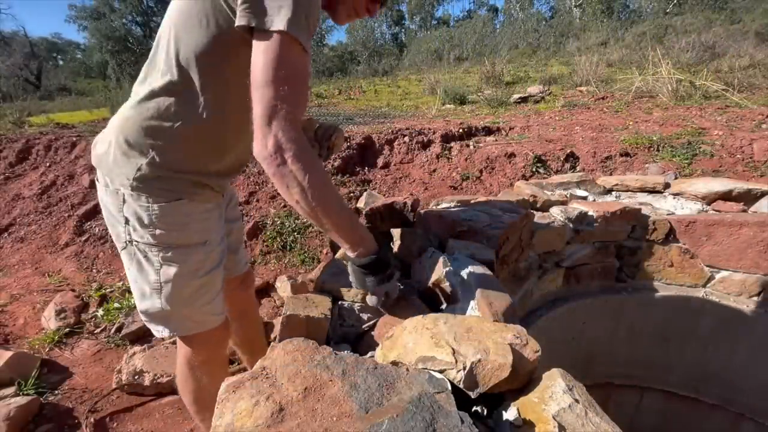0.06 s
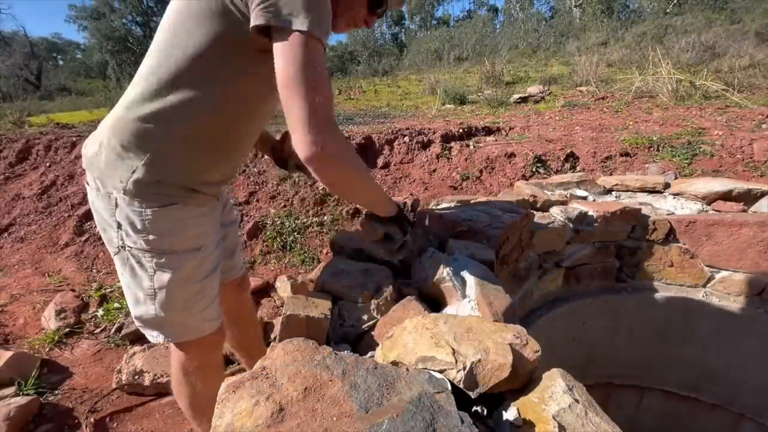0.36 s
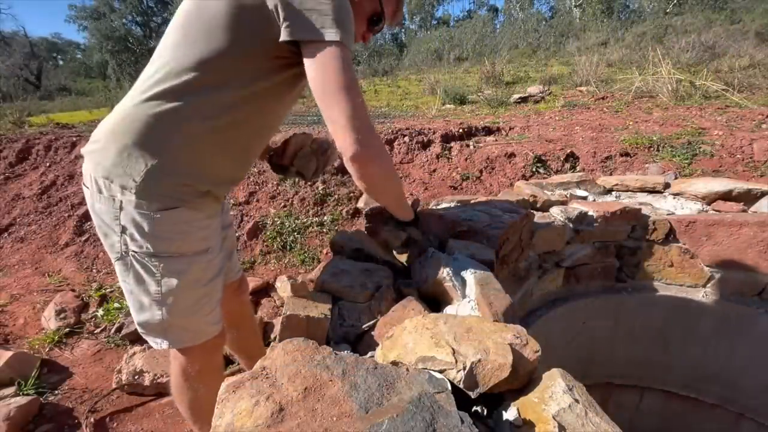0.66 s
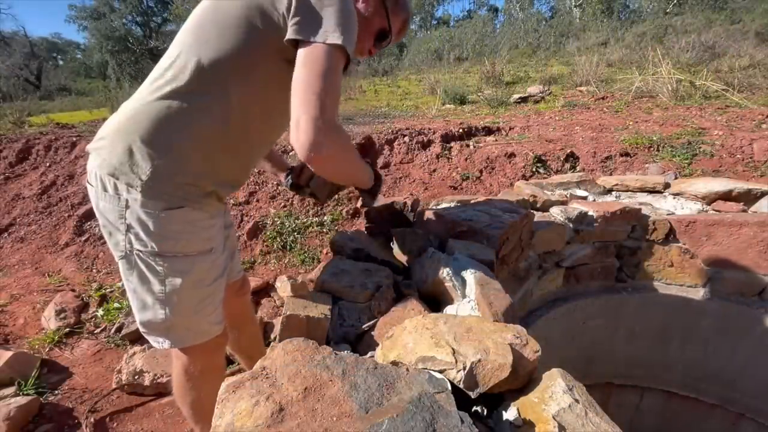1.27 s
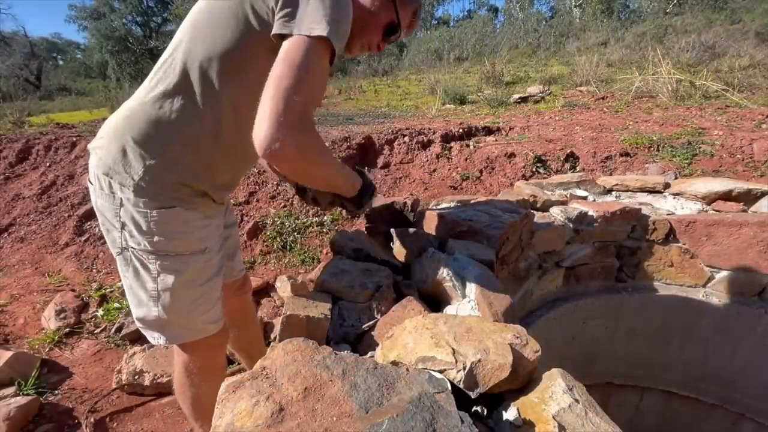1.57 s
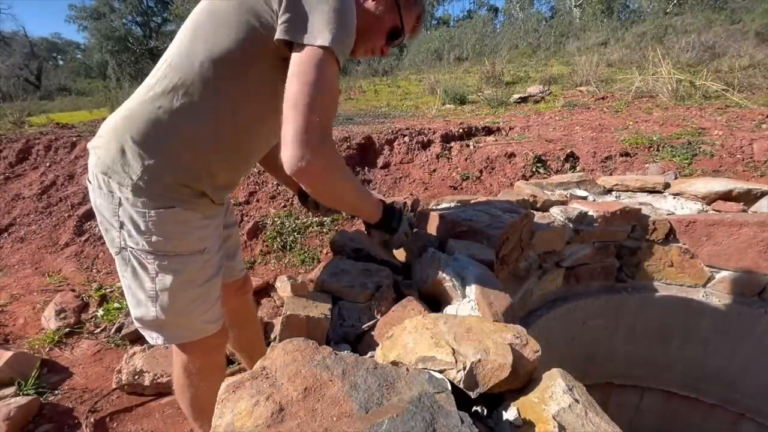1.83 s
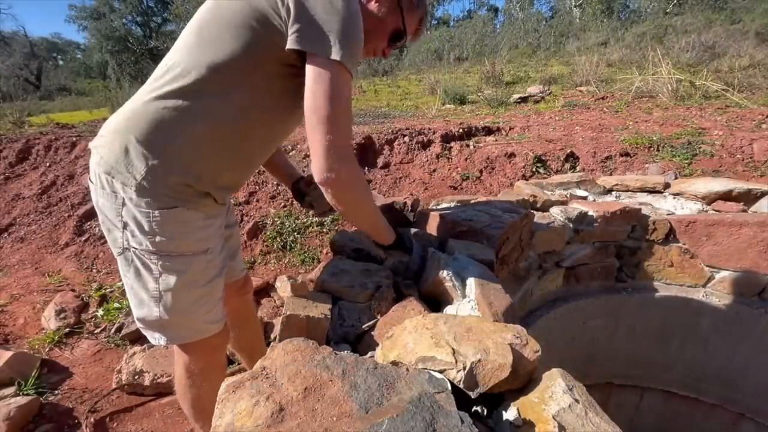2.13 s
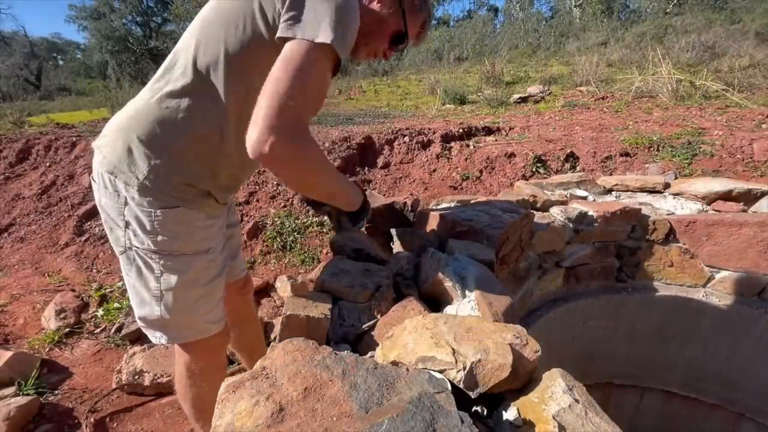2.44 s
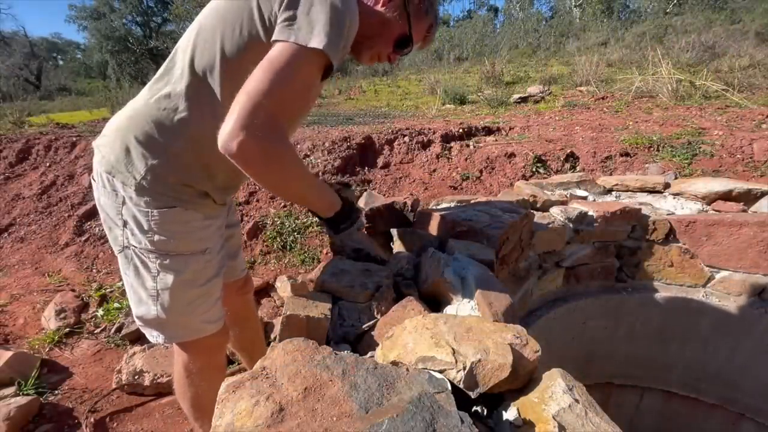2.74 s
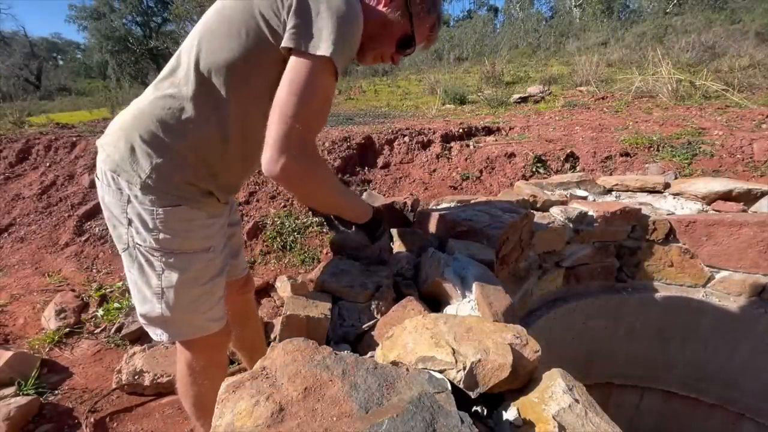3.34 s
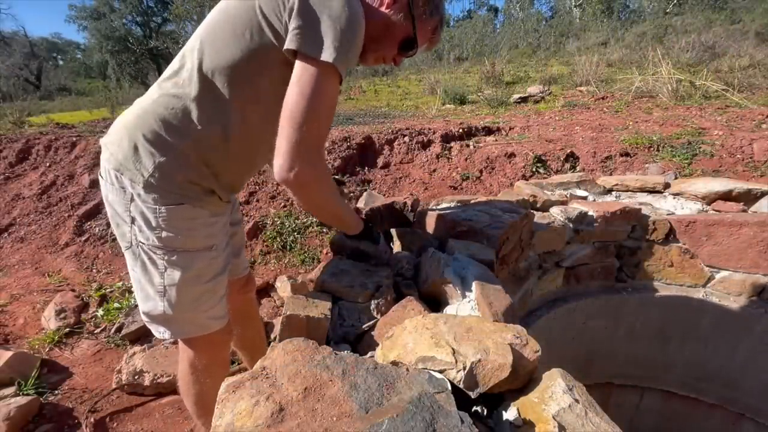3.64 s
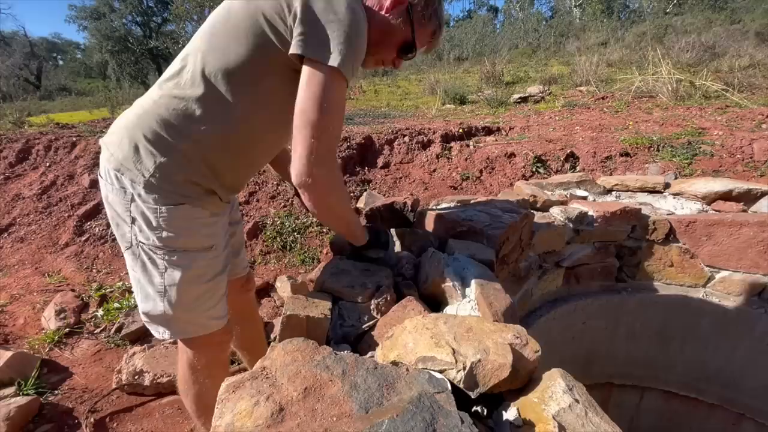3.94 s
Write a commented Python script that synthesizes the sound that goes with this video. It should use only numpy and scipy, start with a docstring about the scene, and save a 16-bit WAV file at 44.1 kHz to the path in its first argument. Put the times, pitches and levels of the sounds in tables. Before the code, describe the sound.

Rocks knock and grind against each other in short clusters, with one louder, heavy stone landing halfway through. Cloth rustles softly between the knocks in quiet open air, and small gusts rumble on the microphone toward the end.

```python
"""Building a rubble wall

A few steps away, outdoors, small stones clack and grind as they are knocked and scraped into place, and a glove
rubs now and then. One heavy stone is set down and rocks to rest. The wall and an earth bank echo briefly. Cloth
rustles close by between the blows, and light wind buffets the microphone, most near the end."""
import sys
import numpy as np
from scipy import signal
from scipy.fft import rfft, irfft, next_fast_len
from scipy.io import wavfile
from scipy.ndimage import uniform_filter1d

SR = 44100
rng = np.random.default_rng(int(sys.argv[2]) if len(sys.argv) > 2 else 0)


def generate_wav(signal):
    """Clip the signal to [-1, 1] and save it as 16-bit WAV at the path in sys.argv[1]."""
    frames = np.transpose(np.atleast_2d(signal))
    scaled = np.clip(frames, -1, 1) * 32767
    pcm = np.round(scaled).astype(np.int16)
    wavfile.write(sys.argv[1], SR, pcm)


N = 176400  # 4 seconds

# Faint outdoor air: f/Hz, level/dB
AIR_SPECTRUM = [(20, -5), (60, 7), (110, -8.5), (220, -12.5), (500, -19), (1000, -25), (2000, -24),
                (5000, -26), (10000, -32), (16000, -42.5)]
# Puffs of wind: peak t/s, half-width/s, level/dB, top f/Hz
WIND_PUFFS = [(.03, 0.074, -58.5, 158), (0.396, 0.037, -57, 127), (0.991, 0.03, -54.5, 220),
              (1.341, 0.054, -49, 97.5), (1.528, 0.043, -60, 92), (2.29, 0.08, -56, 123),
              (2.54, 0.04, -62.5, 99), (2.80, 0.02, -58.5, 87.6), (3.026, 0.025, -39.5, 140.2),
              (3.15, 0.098, -56, 163), (3.251, 0.091, -55.5, 229), (3.339, 0.086, -56, 146),
              (3.50, 0.037, -51, 126), (3.693, 0.068, -48.5, 156), (3.791, 0.033, -40.5, 163),
              (3.846, 0.027, -36.5, 174), (3.895, 0.038, -41.5, 244), (3.938, 0.022, -34, 257),
              (3.968, 0.014, -42, 256)]
# Cloth strokes: start t/s, rise/s, hold/s, release/s, level/dB, treble boost and bass cut/dB
CLOTH_SWISHES = [(-.02, 0.014, 0.075, 0.056, -62.5, -4.5), (0.093, 0.027, 0.11, 0.028, -75, -0.5),
                 (0.384, .1, 0.008, 0.022, -65, 3), (0.502, .005, 0.011, 0.12, -64, -16),
                 (0.814, 0.043, 0.073, .03, -76.5, -12.5), (0.913, 0.024, 0.046, .03, -58, -15),
                 (0.985, 0.097, 0.053, 0.061, -52.5, -6), (1.184, 0.014, 0.0095, 0.03, -63, 1),
                 (1.364, 0.0046, 0.0043, 0.071, -53.5, -4.5), (1.403, 0.043, 0.2, .03, -72.5, -4),
                 (1.539, 0.063, 0.091, 0.06, -57.5, 0.5), (1.797, 0.02, 0.0045, 0.021, -66, -3.5),
                 (1.906, 0.067, 0.029, 0.026, -49, -3.5), (2.015, 0.019, 0.0084, 0.059, -62, 8),
                 (2.071, 0.032, 0.023, 0.38, -64, -3), (2.196, 0.028, 0.0095, 0.046, -48.5, -6),
                 (2.253, 0.036, 0.0059, 0.037, -74, -10), (2.443, 0.035, 0.019, 0.13, -61.5, -2.5),
                 (2.619, 0.064, 0.021, 0.16, -60.5, -1.5), (2.756, 0.13, 0.042, 0.14, -67, 2.5),
                 (2.972, 0.059, 0.16, 0.061, -65, -3.5), (3.186, 0.034, 0.018, 0.021, -70.5, -0.5),
                 (3.344, 0.056, 0.055, 0.038, -48, -1.5), (3.464, 0.015, 0.032, 0.048, -61.5, -9.5),
                 (3.539, 0.024, 0.0057, 0.034, -56, -5), (3.58, 0.058, 0.024, 0.094, -57.5, -2.5),
                 (3.677, 0.029, 0.012, 0.12, -56.5, 1), (3.718, 0.011, 0.071, 0.018, -75.5, -11.5),
                 (3.823, 0.029, 0.14, 0.045, -58, -5)]
# Tone of the rubbing fibres: f/Hz, level/dB
CLOTH_SPECTRUM = [(30, -36.5), (300, -16.5), (700, -9.5), (1200, -1), (2300, -2), (3600, -2), (5000, -3),
                  (7000, -5), (10000, -8), (12200, -3.5), (14000, -14), (16000, -30.5)]
# Tone of the echo off the wall: f/Hz, level/dB
WALL_ECHO_SPECTRUM = [(100, 1.5), (400, -0.5), (750, 6.5), (1200, 6.5), (2000, 5), (5000, -5), (12000, -7)]
# Tone of the echo off the earth bank: f/Hz, level/dB
BANK_ECHO_SPECTRUM = [(60, 5.5), (400, -3), (900, -7), (2000, -7.5), (5000, -10), (14000, -16)]
# How long the bank's echo lasts (t60 is the time to fade by 60 dB): f/Hz, t60/s
BANK_ECHO_DECAY = [(100, 0.5), (400, 0.29), (1000, 0.17), (3000, 0.17), (12000, 0.11)]
# Thin high rings among the small stones: t/s, length/s, level/dB, f/Hz
HIGH_RINGS = [(0.519, 0.034, -57, 9200), (0.574, 0.04, -67, 10240), (.622, 0.011, -73, 9650),
              (.694, .012, -62, 9650), (0.723, 0.01, -71, 9800), (0.759, 0.014, -65, 9870),
              (.78, .012, -59, 9800), (0.812, .01, -62, 9800), (0.835, 0.013, -64, 10100)]
# Stone sliding on grit, and a glove rubbing (the rows near 1.5-1.8 kHz from 2.47 to 3.1 s): t/s, length/s,
# level/dB, f/Hz, ring compared with grind/dB
SCRAPES_AND_RUBS = [(0, 0.035, -43.5, 540, -20), (0.921, 0.037, -32.5, 566.4, 17),
                    (0.934, .09, -45.5, 215, -2), (0.919, 0.026, -45, 6960, 18), (0.975, 0.04, -45, 283, -2),
                    (1.094, 0.025, -49.5, 2230, 5), (2.025, 0.052, -45, 444, -14),
                    (2.07, 0.044, -64, 420, -12), (2.214, 0.044, -51.5, 2296, 6),
                    (2.238, 0.026, -48.5, 4530, 3), (2.253, .06, -51.5, 403, -1),
                    (2.469, 0.03, -64, 1490, 3.5), (2.505, 0.018, -60.5, 3430, 0),
                    (2.68, 0.031, -56.5, 1740, 4), (2.741, 0.047, -68, 1636, 11),
                    (2.864, 0.11, -71.5, 1570, -2), (3.049, 0.048, -69.5, 1760, 5.5),
                    (3.099, 0.022, -59.5, 1496, -1), (3.132, 0.027, -62.5, 2200, -26),
                    (3.405, .02, -53, 1990, -5), (3.407, .016, -44.5, 7470, -6),
                    (3.859, 0.014, -52, 5500, -13), (3.641, 0.024, -52.5, 2830, -3),
                    (3.918, 0.073, -60, 695, -16)]
# Resonances of each scrape or rub: multiple of its pitch, sharpness Q, level/dB
SLIDING_MODES = [(.45, 10, -10.5), (1, 28, 3.5), (1.665, 32, -10.5), (1.93, 30, -7)]
# Stone hitting stone: t/s, thud level/dB, thud f/Hz, clack level/dB, clack f/Hz, grit level/dB
STONE_KNOCKS = [(0.011, -59, 890, -62, 2190, -63), (.086, -34, 608, -52, 2030, -63),
                (0.094, -48.5, 530, -76, 2000, -87), (.110, -57.5, 550, -61, 2060, -71),
                (0.189, -43.5, 694, -67, 1990, -68), (0.205, -45.5, 520, -60, 1900, -87),
                (0.219, -46, 530, -67, 1980, -70.5), (0.301, -50, 465, -57.5, 2200, -68),
                (0.5237, -27.5, 1164, -25, 1730, -32), (0.5267, -37, 890, -36.5, 2380, -51.5),
                (.569, -42, 877, -44, 2200, -58), (0.5941, -61, 800, -64, 2300, -68),
                (0.6615, -61, 760, -74, 1890, -96), (.695, -41.5, 703, -59.5, 2320, -62.5),
                (.725, -41.5, 763, -44, 1880, -70.5), (.752, -40, 678, -57.5, 1850, -74.5),
                (.782, -44.5, 468, -51.5, 2260, -64.5), (.815, -42, 646, -50.5, 2220, -71.5),
                (0.83, -43.5, 560, -58.5, 2375, -65), (0.839, -44.5, 600, -46.5, 2960, -63.5),
                (0.9127, -37.5, 1330, -40, 2210, -63.5), (0.9234, -40.5, 1080, -55, 2300, -48.5),
                (0.927, -38.5, 570, -44.5, 2050, -50), (0.9383, -46.5, 600, -57.5, 2160, -50.5),
                (0.948, -33, 913, -52.5, 2500, -53), (0.9692, -33.5, 963, -48.5, 2400, -46.5),
                (.974, -37.5, 420, -48.5, 2400, -74.5), (0.9817, -33.5, 1023, -30, 2640, -44),
                (0.997, -54, 600, -72, 2800, -52.5), (1.153, -46, 568, -54.5, 2240, -83.5),
                (1.17, -44, 620, -60, 1880, -66), (1.1964, -53.5, 600, -51, 2204, -66),
                (1.202, -41, 834, -50, 2080, -59), (1.215, -43.5, 543, -61, 1890, -75),
                (1.455, -61, 1080, -93, 1800, -92), (1.9845, -39.5, 1020, -24.5, 2660, -38),
                (1.989, -28.5, 1418, -31, 2150, -34), (1.9913, -30, 904, -30, 2310, -44),
                (1.9955, -35, 620, -34, 3700, -46.5), (2.0033, -28.5, 650, -39, 1840, -51.5),
                (2.010, -31, 420, -41, 1820, -55.5), (2.266, -45, 440, -67, 1980, -62),
                (2.2832, -40, 410, -53.5, 1370, -73), (2.328, -47, 458, -63, 2130, -78),
                (2.691, -69.5, 890, -65.5, 2760, -59.5), (3.383, -83, 920, -56, 2500, -55),
                (3.418, -70, 900, -49.5, 2620, -49.5), (3.458, -40, 540, -45, 1540, -47),
                (3.523, -35, 1000, -47, 1850, -66), (3.528, -39, 430, -69, 1800, -75),
                (3.558, -70, 507, -50, 2720, -52.5), (3.573, -39, 356, -52, 2020, -60),
                (3.868, -57.5, 610, -54.5, 2800, -55), (3.934, -50, 525, -53, 1790, -61),
                (3.961, -43, 684, -55.5, 1980, -57.5)]
# Resonances of a struck stone: multiple of its pitch, level/dB
STRUCK_MODES = [(1, 10), (1.6, -10.5)]
# Tone of the wall under each thud: f/Hz, level/dB
WALL_BODY_SPECTRUM = [(60, -31), (130, -16.5), (210, -1), (290, -2), (385, 3.5), (470, -1.5), (700, -12.5),
                      (2000, -34.5), (8000, -81.5)]
# Tone of cracking grit: f/Hz, level/dB
GRIT_SPECTRUM = [(100, -55.5), (2500, -7), (4500, 0), (5800, -8), (7200, -4.5), (8600, -14.5), (9700, 1),
                 (10800, -4), (13000, -16), (16000, -19.5)]
# The heavy stone landing and rocking: t/s, level/dB, most strongly driven f/Hz
HEAVY_TOUCHES = [(1.9945, -14.5, 840), (2.0032, -16, 420), (2.044, -31, 250)]
# Resonances of the heavy stone: f/Hz, level/dB, t60/s
HEAVY_MODES = [(143, -14, .1), (210, -12, 0.15), (382, -2.5, 0.082), (415, -1.5, 0.025), (556, -15.5, 0.12),
               (617.4, -2, 0.079), (659.6, 0.5, .04), (777, -3.5, .04), (1063, -13.5, 0.054),
               (1430, -11, 0.012), (2120, -15, 0.051), (2328, -12, 0.044), (2460, -15, 0.027),
               (2560, -14.5, .04)]

BLOW_SAMPLES, BLOW_WINDOW_S = 4096, .01  # room for one blow; time over which its level is counted


def gain_of(db):
    """Turn decibels into a factor to multiply by."""
    return 10 ** (np.asarray(db) / 20)


def unit_rms(x):
    """Scale a signal so that its average strength (rms) is 1."""
    return x / np.sqrt(np.mean(x ** 2) + 1e-20)


def look_up(points, hz):
    """Read between the rows of a table, on a log-frequency axis."""
    f, value = np.transpose(points)
    return np.interp(np.log(hz + 1), np.log(f + 1), value)


def add(mix, start_s, sound):
    """Mix a sound in at its start time."""
    part = mix[max(round(start_s * SR), 0):][:len(sound)]
    part += sound[:len(part)]


def colour(x, spectrum):
    """Shape a sound's tone with a filter that never rings ahead of it (minimum phase)."""
    size = next_fast_len(2 * x.shape[-1])
    log_gain = np.log(gain_of(look_up(spectrum, abs(np.fft.fftfreq(size, 1 / SR)))))
    response = np.exp(np.conj(signal.hilbert(log_gain)))[:size // 2 + 1]
    return irfft(rfft(x, size) * response, size)[..., :x.shape[-1]]


def band(x, low_hz, high_hz, order=2):
    """Keep the frequencies between two limits."""
    high_hz = np.clip(high_hz, low_hz + 10, SR / 2 - 10)
    return signal.sosfilt(signal.butter(order, [low_hz, high_hz], 'band', fs=SR, output='sos'), x)


def delayed(x, ms):
    """Delay a sound by a fraction of a millisecond."""
    return irfft(rfft(x) * np.exp(-2j * np.pi * np.fft.rfftfreq(N, 1 / SR) * ms / 1000), N)


def wander(samples):
    """A random drift of rms 1, smoothed over this many samples."""
    return unit_rms(uniform_filter1d(uniform_filter1d(rng.standard_normal(N), samples), samples))


def at_level(x, db):
    """Give a blow the energy of this level held for BLOW_WINDOW_S."""
    return x * gain_of(db) * np.sqrt(BLOW_WINDOW_S * SR / np.sum(x ** 2))


def air():
    """Outdoor air is a faint, steady, mostly low noise."""
    return gain_of(-70) * unit_rms(colour(rng.standard_normal((2, N)), AIR_SPECTRUM))


def wind():
    """Swirls of air rumble on the two sides of the microphone, mostly on each side separately."""
    t, out = np.arange(N) / SR, np.zeros((2, N))
    for peak_s, width_s, db, top_hz in WIND_PUFFS:
        swirls = rng.standard_normal((3, N))  # left, right, shared
        rumble = unit_rms(band(swirls[:2] + .5 * swirls[2], low_hz=48, high_hz=top_hz, order=3))
        out += gain_of(db) * np.exp(-((t - peak_s) / width_s) ** 2) * rumble
    return out * gain_of([[2], [-2]])  # louder on the left


def rubbing_fibres():
    """Fibres catch and slip in a fluttering hiss, and grit caught under the cloth crackles."""
    crackles_per_s, shared, patch_db, flutter_db = 410, 0.34, 2.5, 2
    crackles = rng.random(N) < crackles_per_s / SR
    crackle_db = 5.5 * np.minimum(rng.exponential(1, N), 3)
    crackles = crackles * gain_of(crackle_db) * rng.choice([-1, 1], N)
    left, right = rng.standard_normal((2, N))
    left = unit_rms(left + gain_of(-5) * unit_rms(crackles))
    right = shared * delayed(left, ms=0.094) + np.sqrt(1 - shared ** 2) * right
    spectrum, hiss = rfft(np.array([left, right])), np.zeros((2, N))
    hz, centres_hz = np.fft.rfftfreq(N, 1 / SR), np.geomspace(700, 12000, 9)
    for one_band in np.eye(len(centres_hz)):  # each band swells on its own
        patch = irfft(spectrum * np.interp(hz, centres_hz, one_band), N)
        hiss += patch * gain_of(patch_db * wander(samples=700))
    return unit_rms(colour(hiss * gain_of(flutter_db * wander(samples=450)), CLOTH_SPECTRUM))


def cloth():
    """Each stroke of the cloth makes the rubbing swell and fade, with its own brightness."""
    t, low_gain, high_gain = np.arange(N) / SR, np.zeros(N), np.zeros(N)
    for start_s, rise_s, hold_s, release_s, db, bright_db in CLOTH_SWISHES:
        before_hold = 1 - (t - start_s) / rise_s
        after_hold = (t - start_s - rise_s - hold_s) / release_s
        stroke = np.exp(-3 * np.maximum(np.maximum(before_hold, after_hold), 0) ** 1.3)
        low_gain += stroke * gain_of(db - bright_db)
        high_gain += stroke * gain_of(db + bright_db)
    fibres = rubbing_fibres()
    low = signal.sosfilt(signal.butter(1, 3500, fs=SR, output='sos'), fibres)
    return (low * low_gain + (fibres - low) * high_gain) * gain_of([[.5], [-.5]])  # a little to the left


def with_echoes(x):
    """Sound arrives directly, then scattered off the wall, then as a weak, dull tail from the bank."""
    wall_db, wall_t60, wall_delay_s = -9, .03, .001
    bank_db, bank_delay_s = -10, 0.009
    t = np.arange(SR // 2) / SR
    wall, bank = rng.standard_normal((2, 2, len(t))) * (rng.random((2, 2, len(t))) < .1)
    wall *= gain_of(-60 * t / wall_t60) * (t > wall_delay_s)
    wall = colour(wall / np.linalg.norm(wall, axis=1, keepdims=True), WALL_ECHO_SPECTRUM)
    wall = wall[0] * np.array([[1], [-1]])  # opposite signs left and right widen the sound
    hz, frame_s, bands = signal.stft(bank, SR, nperseg=256)
    bands *= gain_of(-60 * frame_s / look_up(BANK_ECHO_DECAY, hz)[:, None])  # the bass lasts longest
    bank = signal.istft(bands, SR, nperseg=256)[1][:, :len(t)] * (t > bank_delay_s)
    bank = colour(bank / np.linalg.norm(bank, axis=1, keepdims=True), BANK_ECHO_SPECTRUM)
    reflections = gain_of(wall_db) * wall + gain_of(bank_db) * bank
    direct = np.array([x, delayed(x, ms=0.031)])  # reaches the right side later
    return direct + signal.fftconvolve(x[None], reflections, axes=1)[:, :N]


def high_rings():
    """A thin, high ring flickers along with the clatter of the small stones."""
    out, half_width_hz = np.zeros(N), 110
    for start_s, length_s, db, hz in HIGH_RINGS:
        ring = band(rng.standard_normal(SR // 4), hz - half_width_hz, hz + half_width_hz)
        ring = unit_rms(ring[-round(length_s * SR):])
        envelope = np.sin(np.pi * np.sqrt(np.linspace(0, 1, len(ring))))
        add(out, start_s, gain_of(db) * ring * envelope)
    return out


def scrapes():
    """A sliding stone, or a rubbing glove, moves in quick, uneven slips that grind and make it ring."""
    slips_per_s, slip_spread_db, band_ratio = 540, 3.5, 1.61
    out, size = np.zeros(N), SR // 4
    for start_s, length_s, db, hz, ring_db in SCRAPES_AND_RUBS:
        slips = (rng.random(size) < slips_per_s / SR) * rng.choice([-1, 1], size)
        slips = slips * gain_of(slip_spread_db * rng.standard_normal(size))
        ring = np.zeros(size)
        for multiple, q, mode_db in SLIDING_MODES:
            resonance = signal.iirpeak(min(hz * multiple, .45 * SR), q, SR)
            ring += gain_of(mode_db) * unit_rms(signal.lfilter(*resonance, slips))
        grind = unit_rms(band(slips, hz / band_ratio, hz * band_ratio))
        scrape = grind + gain_of(ring_db) * unit_rms(band(ring, hz / 2, hz * 2))
        scrape = unit_rms(scrape[-round(length_s * SR):])
        envelope = np.sqrt(abs(np.sin(np.linspace(0, np.pi, len(scrape)))))
        add(out, start_s, gain_of(db) * scrape * envelope)
    return out


def contact(t60):
    """A sharp touch, then the dense, quickly dying ring of an uneven stone."""
    t = np.arange(BLOW_SAMPLES) / SR
    ring = rng.standard_normal(len(t)) * gain_of(-60 * t / t60)
    ring[0] = 2 * np.sqrt(1 + t60 / BLOW_WINDOW_S)  # the first touch
    return ring


def knocks():
    """At each blow the bedded stone thuds into the wall, the loose one clacks and grit cracks."""
    thud_ratio, clack_ratio = 1.517, 1.397  # each band reaches this factor below and above its pitch
    ring_t60, ring_db, wall_delay_s, wall_db = 0.058, -6, .002, -4.5
    out, t = np.zeros(N), np.arange(BLOW_SAMPLES) / SR
    for start_s, thud_db, thud_hz, clack_db, clack_hz, grit_db in STONE_KNOCKS:
        thud = band(contact(t60=0.034), thud_hz / thud_ratio, thud_hz * thud_ratio, order=3)
        ring = sum(gain_of(db - 60 * t / ring_t60) * np.sin(2 * np.pi * thud_hz * multiple * t)
                   for multiple, db in STRUCK_MODES)
        wall = colour(contact(t60=0.067), WALL_BODY_SPECTRUM)
        clack = band(contact(t60=0.017), clack_hz / clack_ratio, clack_hz * clack_ratio, order=3)
        grit = colour(contact(t60=0.014), GRIT_SPECTRUM)
        add(out, start_s, at_level(unit_rms(thud) + gain_of(ring_db) * unit_rms(ring), thud_db))
        add(out, start_s + wall_delay_s, at_level(wall, thud_db + wall_db))
        add(out, start_s, at_level(clack, clack_db))
        add(out, start_s, at_level(grit, grit_db))
    return out


def heavy_stone():
    """The big stone lands on one edge, drops flat with a deeper clunk and rocks back once."""
    sharp_share, settle_s = 0.076, 0.0041  # each ring starts high and sinks as the stone beds in
    db_per_octave = 10  # a touch mostly drives the resonances near its own pitch
    swell_cycles = 1.4  # a ring takes this many cycles to build, so the bass comes last
    out, t = np.zeros(N), np.arange(SR // 2) / SR
    bent_time = t + sharp_share * settle_s * (1 - np.exp(-t / settle_s))
    for start_s, db, touch_hz in HEAVY_TOUCHES:
        for hz, mode_db, t60 in HEAVY_MODES:
            drive_db = db + mode_db - db_per_octave * abs(np.log2(hz / touch_hz))
            envelope = gain_of(drive_db - 60 * t / t60) * (1 - np.exp(-t * hz / swell_cycles))
            add(out, start_s, envelope * np.sin(2 * np.pi * (hz * bent_time + rng.random())))
    return out


def scene():
    """Mix the stones and their echoes with cloth, wind and air."""
    stones = np.array([knocks() + scrapes() + high_rings(), heavy_stone()])
    small, heavy = band(stones, low_hz=90, high_hz=14400)  # the range that the stones give off
    to_the_right = gain_of([[-0.96], [0.96]])
    return with_echoes(small) + with_echoes(heavy) * to_the_right + cloth() + wind() + air()


def record(dry):
    """The recorder cuts off the highest treble."""
    low_pass = signal.firwin(511, cutoff=16300, window=("kaiser", 9), fs=SR)
    return signal.oaconvolve(dry, low_pass[None], "same")


dry = scene()
out = record(dry)
generate_wav(out)
```